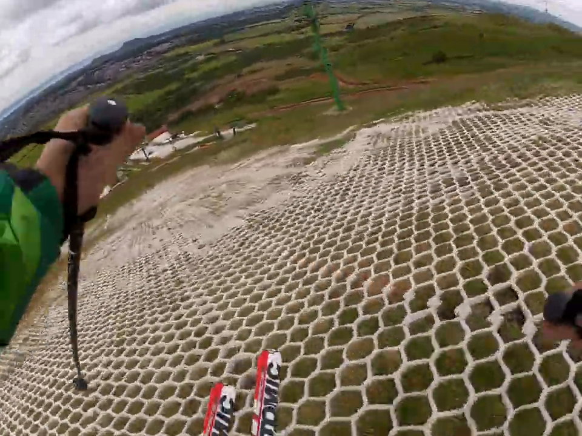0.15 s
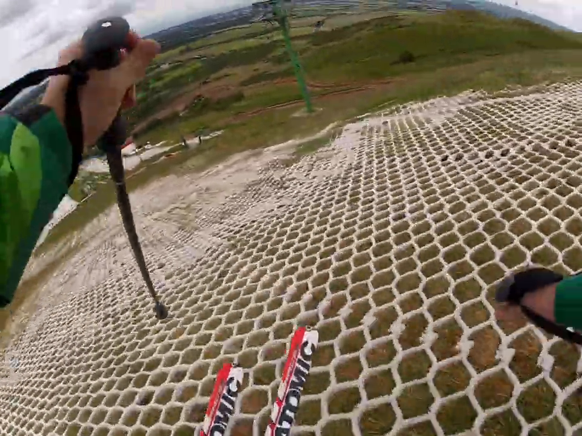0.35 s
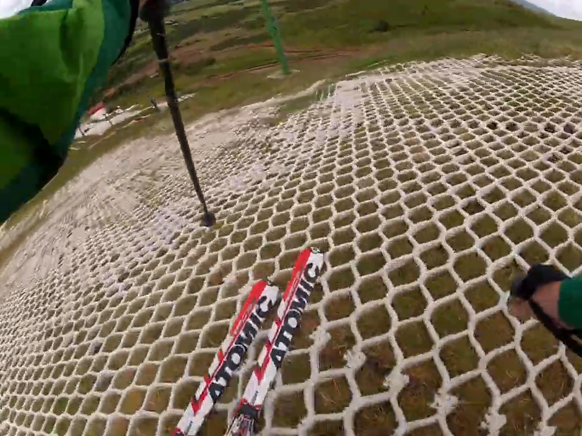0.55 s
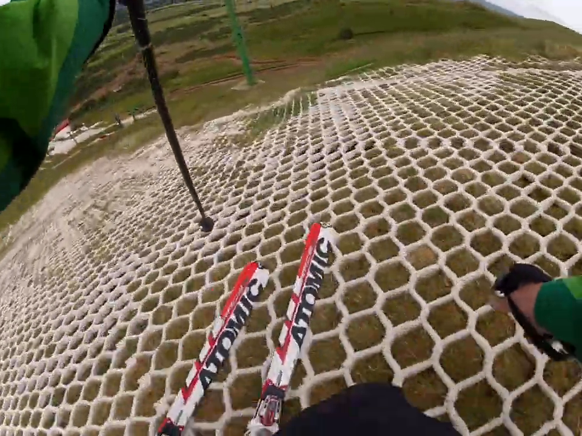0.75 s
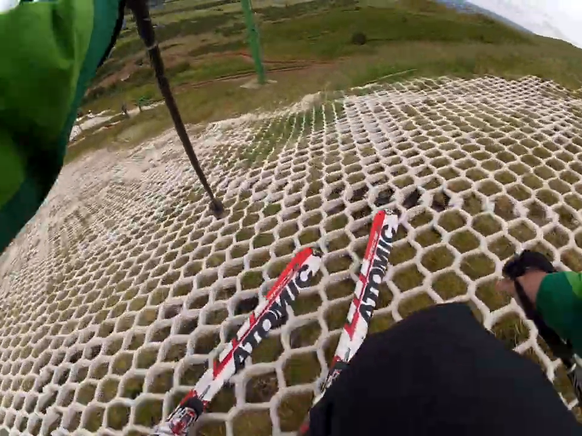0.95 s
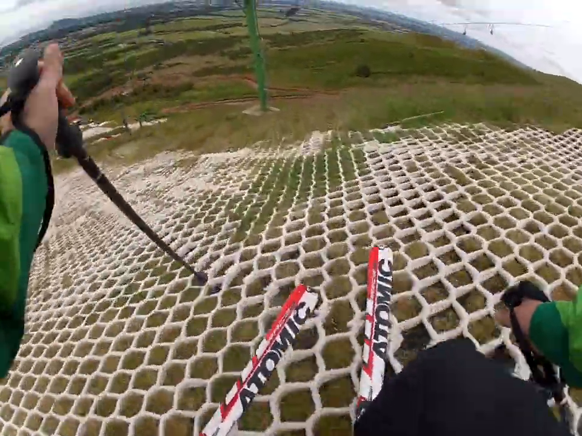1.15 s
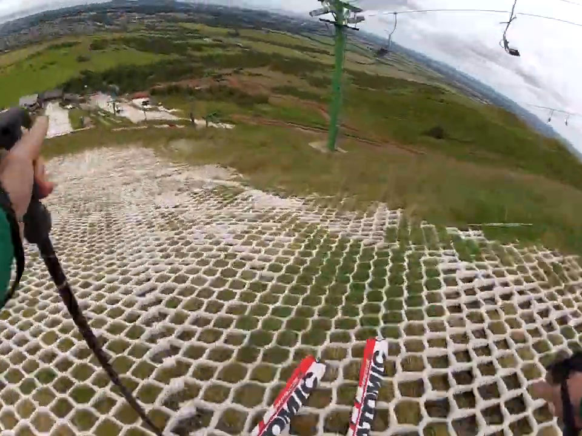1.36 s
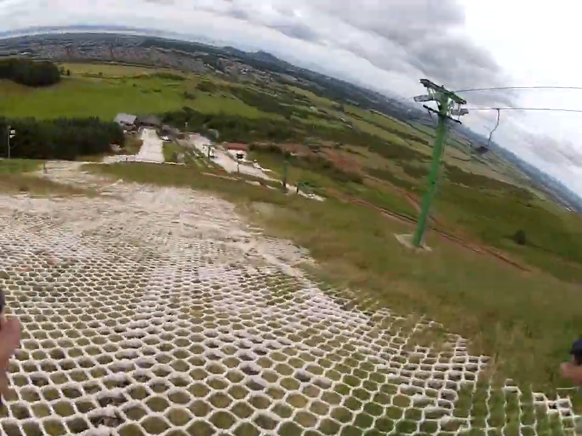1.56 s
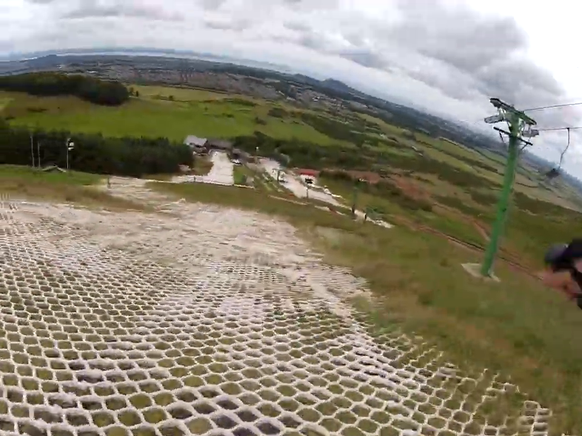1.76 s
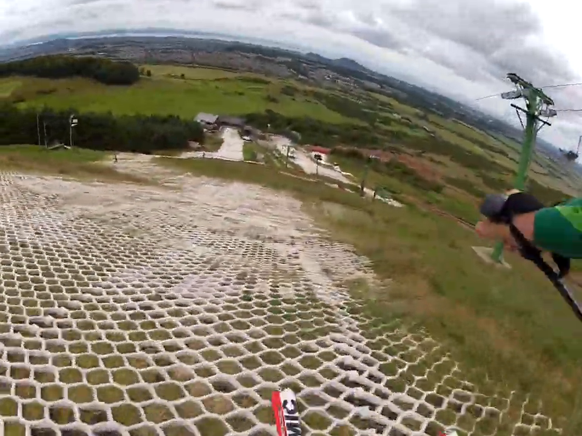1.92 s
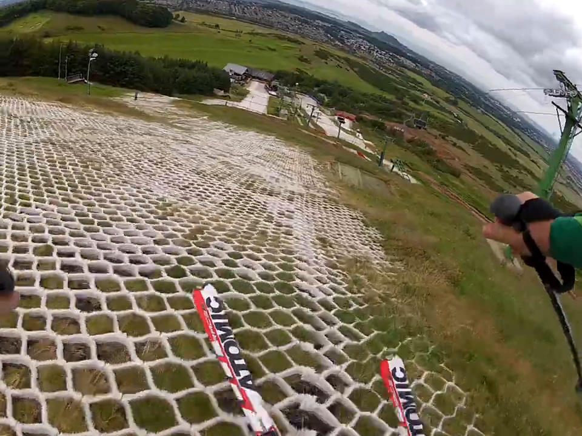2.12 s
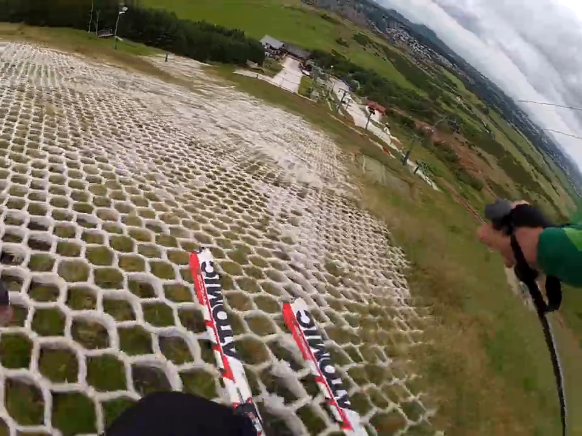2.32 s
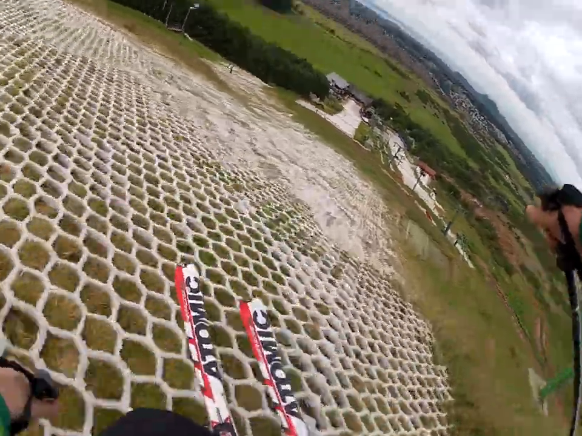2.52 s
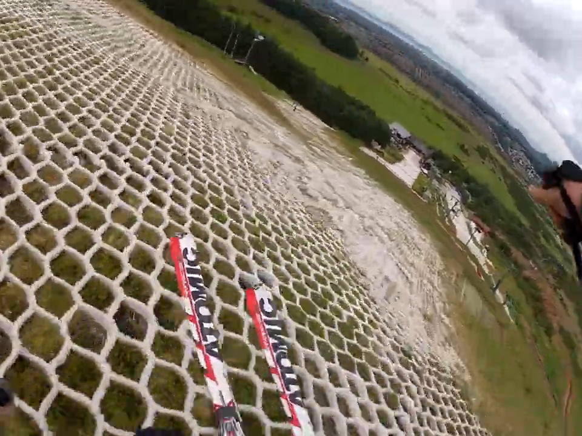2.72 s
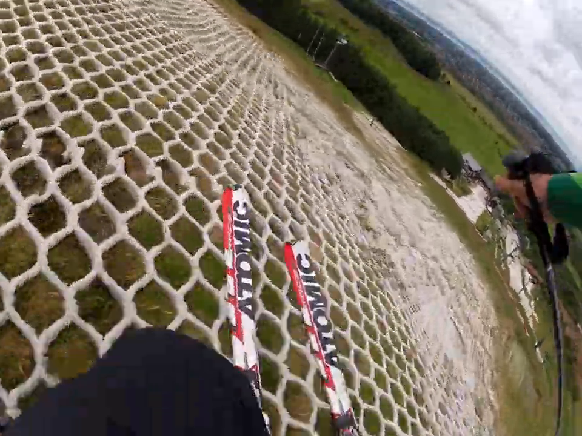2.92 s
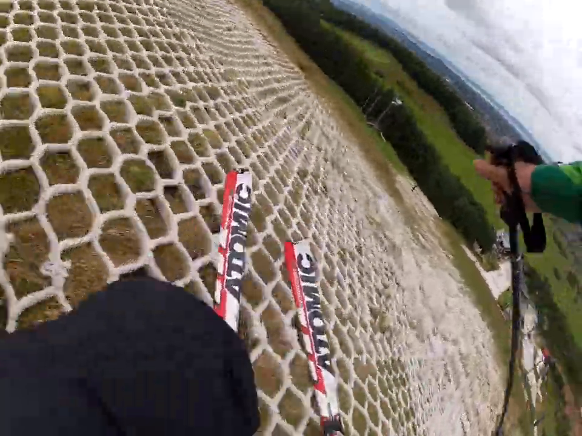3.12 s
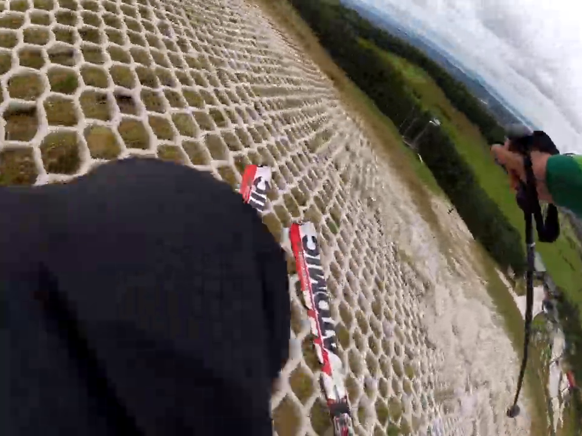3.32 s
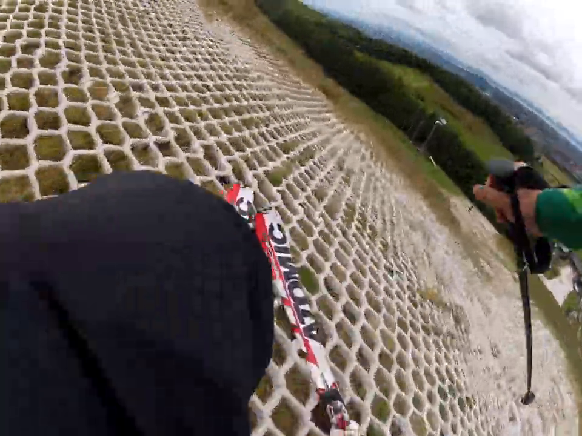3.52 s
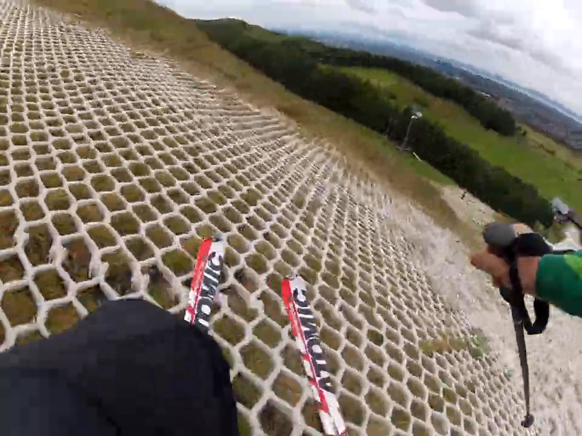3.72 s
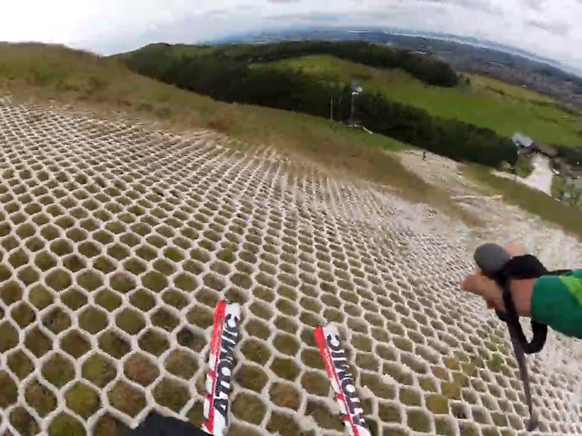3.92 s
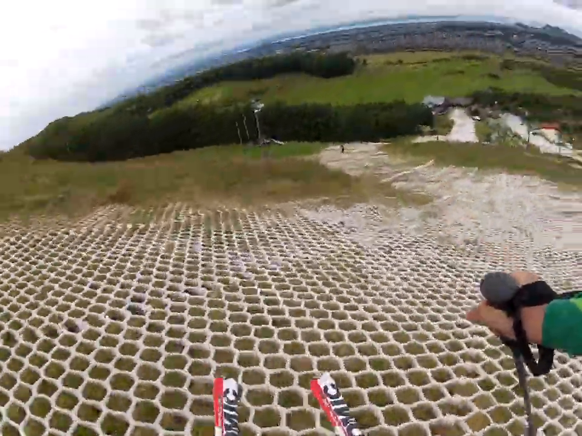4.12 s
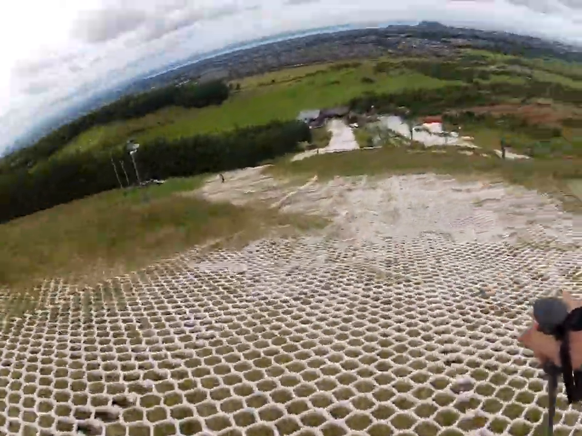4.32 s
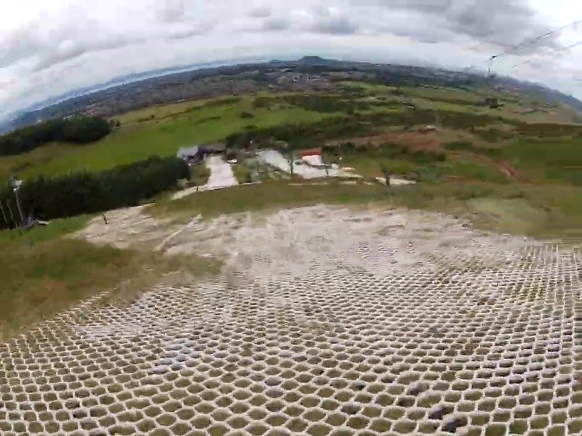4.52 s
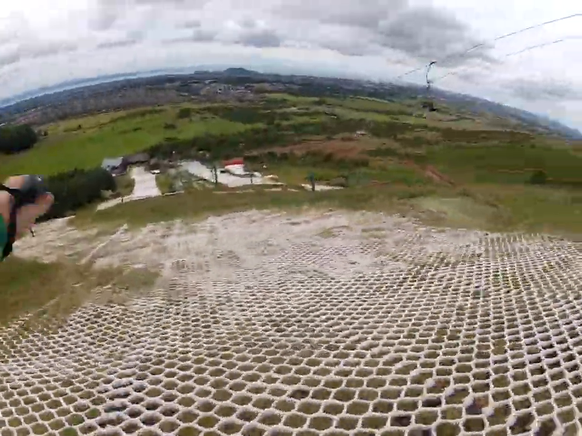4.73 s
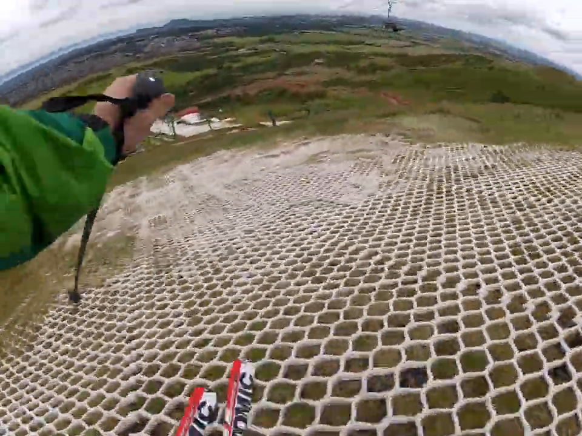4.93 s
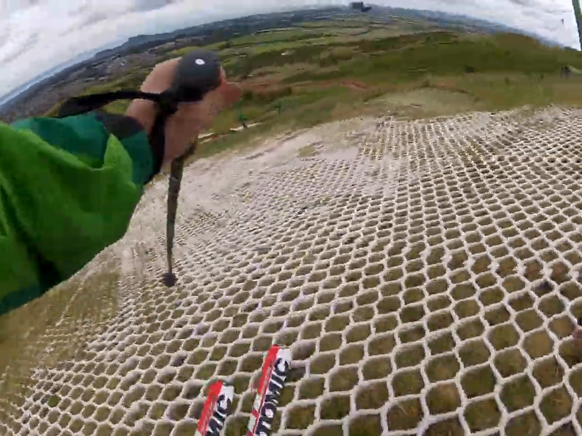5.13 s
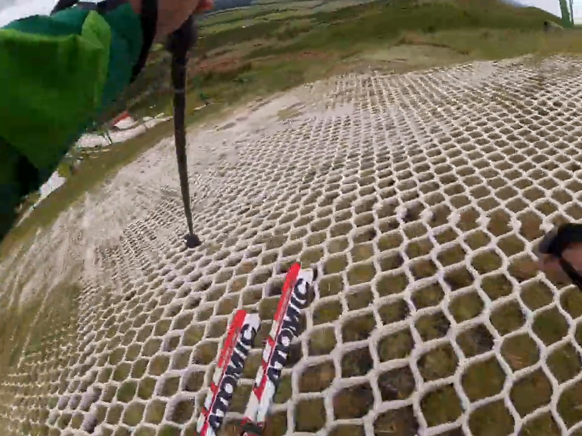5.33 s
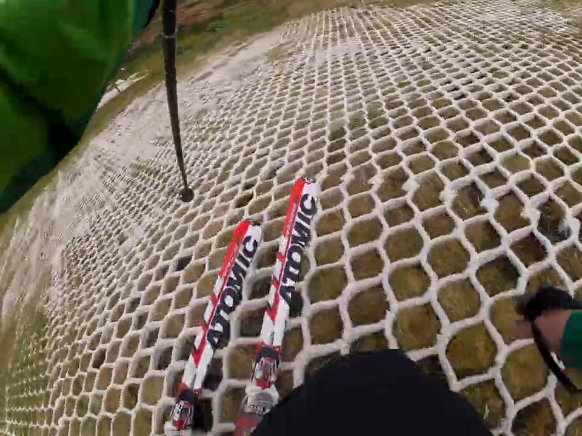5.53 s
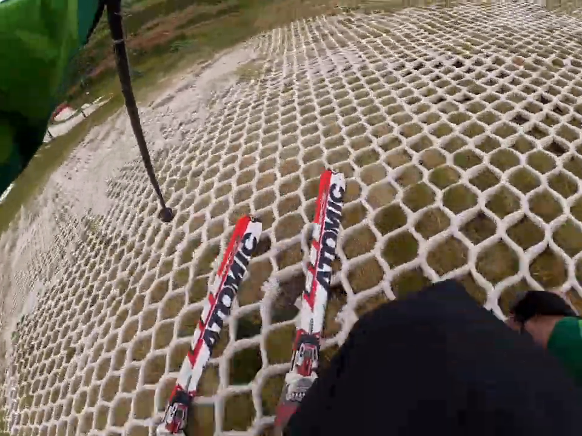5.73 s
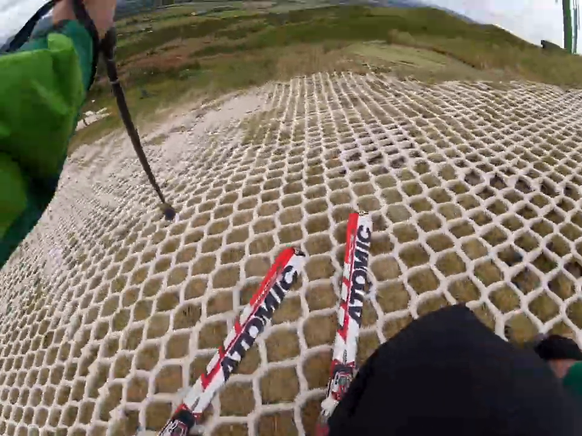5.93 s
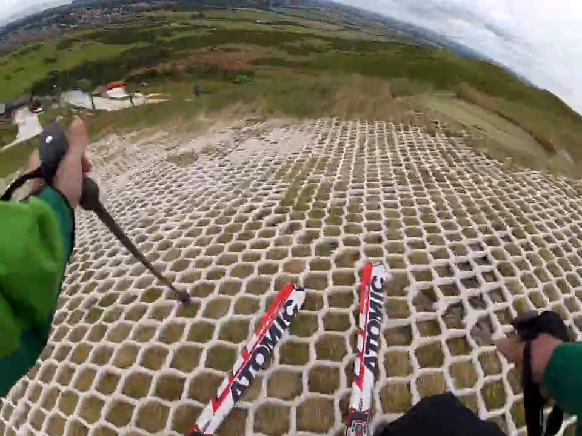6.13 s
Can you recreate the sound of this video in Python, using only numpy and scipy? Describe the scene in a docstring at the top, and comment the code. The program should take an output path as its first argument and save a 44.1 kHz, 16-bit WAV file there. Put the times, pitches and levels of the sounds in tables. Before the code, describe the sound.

Skis run down a plastic bristle slope in three turns, heard close from a body-worn microphone. The edges make a gritty, ringing scrape with tiny squeaks, over a hiss and low rumble, all with a glassy fizz. Wind buffets the microphone, strongly around 0.3 seconds. The first turn swells from 0.4 to 1.2 seconds, with a sharp clack of gear at 0.6. Everything drops to a lull around 1.6 to 1.9 seconds. Light knocks near 2 seconds open the second turn, with a faint swish of grass. Clacks and dull ski slaps cluster from 2.7 to 2.9 seconds, and the scrape stays strong until about 3.7. It then recedes under short gusts, and the wind surges from 4.6 to 5.1 seconds. The third turn bites hardest around 5.4 seconds with a brief squeak, then scrape and wind fade by about 6.3.

```python
"""On a bristle-mat dry ski slope: three turns, heard close up from a camera worn on the skier's body.
Wind buffets the microphone as the skier swings through the fall line. Underfoot the skis rumble over
the ribs of the mat, hiss sideways, brush the grass at its side, and now and then clack and slap down.
The edges flick thousands of stiff plastic bristles, biting, skipping and squeaking as they go.
The camera holds each of its 12000 samples a second, which adds a glassy fizz."""
import sys
import numpy as np
from scipy import signal
from scipy.fft import rfft, irfft, next_fast_len
from scipy.io import wavfile
from scipy.ndimage import uniform_filter1d, map_coordinates

SR = 44100
rng = np.random.default_rng(int(sys.argv[2]) if len(sys.argv) > 2 else 0)


def dump_mix(stems):
    """Bounce the given channels to the path in sys.argv[1] as a 16-bit WAV at rate SR."""
    frames = np.atleast_2d(stems).T  # one column per channel
    limited = np.clip(frames, -1, 1)  # hard clip at full scale
    pcm = np.round(limited * 32767).astype(np.int16)
    wavfile.write(sys.argv[1], SR, pcm)


N = 276066
TIME = np.arange(N) / SR


def undb(db):
    """Decibels to gain."""
    return 10 ** (np.asarray(db) / 20)


def unit(x):
    """Scale to rms 1."""
    return x / np.sqrt(np.mean(x ** 2))


def curve(table):
    """A control joined by straight lines in time."""
    return np.interp(TIME, *np.transpose(table))


def bump(centre_s, width_s):
    """A smooth hump of height 1, width_s wide at half height."""
    return np.exp(-np.log(2) * (2 * (TIME - centre_s) / width_s) ** 2)


def add(out, start_s, sound, peak_db):
    """Mix a sound in at start_s with the given peak."""
    part = out[int(start_s * SR):][:len(sound)]
    part += (sound * undb(peak_db) / np.abs(sound).max())[:len(part)]


def colour(x, points):
    """Causal filter through the given (freq_hz, gain_db) points."""
    size = next_fast_len(len(x) // 2 + 4096) * 2
    hz, db = np.transpose(points)
    bin_hz = np.arange(size // 2 + 1) * SR / size
    gain_db = np.interp(np.log(bin_hz + 1), np.log(hz), db)
    cepstrum = irfft(np.log(undb(gain_db)))
    cepstrum[1:size // 2] *= 2  # fold onto positive time for minimum phase
    cepstrum[size // 2 + 1:] = 0
    return irfft(rfft(x, size) * np.exp(rfft(cepstrum)))[:len(x)]


def resonate(x, hz, width_hz):
    """Two-pole resonance, gain 1 at the centre."""
    return signal.lfilter(*signal.iirpeak(hz, hz / width_hz, fs=SR), x)


def walk(rate_hz):
    """Smooth random motion of rms 1 through rate_hz values a second."""
    knots = rng.standard_normal(4096)
    return unit(map_coordinates(knots, [TIME * rate_hz], order=2, mode="wrap"))


def flutter(rate_hz, depth_db):
    """A wavering gain that keeps the mean power."""
    return unit(undb(depth_db * walk(rate_hz)))


def flicks(per_second, spread_db):
    """Dense clicks of uneven size, as of bristles snapping free."""
    hit = rng.random(N) < per_second / SR
    sign = rng.choice([-1, 1], N)
    size_db = spread_db * np.clip(rng.standard_normal(N), -2, 2)
    return unit(hit * sign * undb(size_db))


def puffs(points, rate_hz, depth_db):
    """Uneven eddies that even out over a fraction of a second."""
    eddies = colour(rng.standard_normal(N) * flutter(rate_hz, depth_db), points)
    return eddies / np.sqrt(uniform_filter1d(eddies ** 2, size=SR // 8))


# air flow at the microphone, swelling through the fall line: time_s, level_db (0 is full flow)
AIR_FLOW = [(0.0, -9.5), (0.33, -0.5), (0.61, -14.0), (0.71, -6.0), (1.08, -23.0), (1.76, -38.5),
            (1.92, -29.0), (2.0, -19.0), (2.73, -11.0), (3.68, -12.0), (3.88, -23.5), (4.27, -20.0),
            (4.62, -1.5), (5.01, -2.5), (5.75, -11.5), (6.26, -36.0)]
# gusts striking the microphone: centre_s, buffet_rise_db, push_rise_db, width_s
MIC_GUSTS = [(.09, 0.5, 7.5, .06), (0.505, 3, 3.5, .06), (.78, -0.5, 5.5, 0.32), (1.56, 7, 10, .08),
             (1.812, 6, 17, 0.091), (2.703, 4, 6, 0.075), (3.257, 3, 6.5, 0.12), (3.507, 7, 5, 0.067),
             (3.706, 6.5, 10, 0.035), (4.055, 12, 12, 0.056), (4.178, 11, 0, 0.045), (4.8, 0, 8, 0.069),
             (5.067, 4, 4, .08), (5.645, 4.5, 5.5, 0.085)]
# small eddies right at the microphone port: freq_hz, gain_db
BUFFET_SPECTRUM = [(30, -27), (70, -3.5), (115, 2), (210, -1), (340, -6.5), (500, -15), (700, -27.5),
                   (1100, -42.5), (3000, -66)]
# the deep push of large eddies: freq_hz, gain_db
PUSH_SPECTRUM = [(6, -28), (14, 4.5), (25, -6.5), (45, 0.5), (75, 1), (110, -6.5), (200, -34.5), (600, -59)]


def wind():
    """Small eddies flap at the microphone port; large ones push on it slowly."""
    flow_db = curve(AIR_FLOW)
    gusty_db = flow_db + 0.67 * walk(rate_hz=15)
    buffet_db = -13.5 + gusty_db + sum(db * bump(s, width) for s, db, _, width in MIC_GUSTS)
    push_db = -22 + 0.8 * gusty_db + sum(db * bump(s, width) for s, _, db, width in MIC_GUSTS)
    # the small eddies rise in pitch with the flow and as the skier gathers speed
    octaves = 0.0146 * flow_db + 0.057 * TIME
    eddies = puffs(BUFFET_SPECTRUM, rate_hz=80, depth_db=1.5)
    buffet = map_coordinates(eddies, [np.cumsum(2 ** octaves)], order=3, mode="mirror")
    push = puffs(PUSH_SPECTRUM, rate_hz=41, depth_db=0.7)
    return buffet * undb(buffet_db) + push * undb(push_db)


# grass at the side of the mat: freq_hz, gain_db
GRASS_SPECTRUM = [(400, -17), (850, -2), (1100, -4), (1400, 4), (1750, -5.5), (3000, -18)]


def grass(enter_s=2.145, leave_s=3.15, rise_db_per_s=75, fall_db_per_s=15):
    """Stalks swish under the outer ski in the second turn: a quick entry, a hold and a slow exit."""
    before_db = rise_db_per_s * np.maximum(enter_s - TIME, 0)
    after_db = fall_db_per_s * np.maximum(TIME - leave_s, 0)
    swish = unit(colour(flicks(per_second=3000, spread_db=8), GRASS_SPECTRUM))
    return swish * undb(-36 - before_db - after_db)


# the skis drumming underfoot: freq_hz, gain_db
RUMBLE_SPECTRUM = [(40, -6.5), (200, -10.5), (400, 0), (600, -0.5), (700, -5), (820, -13.5), (1100, -21),
                   (2000, -43.5)]


def rumble(edging_db, flow_db):
    """Ribs of the mat drum on the skis, harder with load and with speed, which the air flow follows."""
    drumming = unit(colour(flicks(per_second=1500, spread_db=3), RUMBLE_SPECTRUM))
    level_db = -26 + 0.41 * edging_db + 0.19 * flow_db
    return drumming * flutter(rate_hz=49, depth_db=0.5) * undb(level_db)


# the skier changes edges and a turn begins: start_s
TURN_STARTS = [-0.24, 1.92, 4.26]
# the skis slip sideways: centre_s, rise_db, width_s
SIDE_SLIPS = [(0.642, 2.5, .11), (1.55, 4.5, 0.073), (2.15, 3.5, 0.21), (2.88, 4, .07), (4.22, 1.5, .2),
              (4.948, 2.5, 0.12), (5.39, 2.5, .1)]
# hiss of the bases, a leg's length below the microphone: freq_hz, gain_db
SKID_SPECTRUM = [(300, -17), (750, -4.5), (1080, -5.5), (1450, 0), (2600, -2), (3400, 1), (3900, 3),
                 (4400, 1.5), (4950, 2), (5500, -6), (6000, -8.5)]


def skid(edging_db, flow_db, fade_db_per_s=0.94):
    """The bases slide over the bristle tips with a gritty hiss, louder with load and speed."""
    starts = np.array(TURN_STARTS)
    turn_age_s = TIME - starts[np.searchsorted(starts, TIME) - 1]
    turn_age_s = uniform_filter1d(turn_age_s, size=SR // 8)  # ease the change of edges
    carve_db = -fade_db_per_s * turn_age_s  # each turn starts as a skid and settles into a carve
    slip_db = sum(db * bump(s, width) for s, db, width in SIDE_SLIPS)
    level_db = -26.5 + 0.66 * edging_db + 0.082 * flow_db
    hiss = unit(colour(flicks(per_second=7000, spread_db=1), SKID_SPECTRUM))
    return hiss * undb(level_db + slip_db + carve_db)


def contact(rattle_s, rattle_gain):
    """One sharp blow, then a rattle that falls 17 dB every rattle_s."""
    t = np.arange(2048) / SR
    return (t == 0) + rattle_gain * rng.standard_normal(len(t)) * np.exp(-2 * t / rattle_s)


# a ski lands on the mat: start_s, peak_db, pitch_hz
SKI_SLAPS = [(0.5823, -15, 480), (1.942, -17, 740), (2.04, -18.5, 450), (2.717, -13, 557),
             (2.8063, -7, 540), (2.8118, -8.5, 500), (2.858, -10.5, 450), (2.893, -15, 560)]
# the dull tone of a landing: freq_hz, gain_db
SLAP_SPECTRUM = [(80, -2), (330, 4), (700, -7.5), (950, -10), (1600, -12), (5000, -11)]


def slaps():
    """A ski slaps down on the mat with a short, dull thud."""
    out = np.zeros(N)
    for start_s, peak_db, pitch_hz in SKI_SLAPS:
        thud = resonate(contact(rattle_s=0.0073, rattle_gain=0.059), pitch_hz, width_hz=170)
        add(out, start_s, colour(thud, SLAP_SPECTRUM), peak_db)
    return out


# skis, bindings and poles knock close to the microphone: start_s, peak_db, pitch_hz, rattle_s
GEAR_CLACKS = [(0.5819, 0.4, 4170, 0.0026), (0.5833, -8, 2950, .004), (.9645, -15, 3300, .003),
               (1.714, -20, 2660, 0.0054), (1.9408, -15.5, 2160, 0.008), (2.0365, -13.5, 3670, 0.0035),
               (2.6812, -15.5, 3500, 0.0033), (2.714, -11, 3400, 0.0034)]
# a blow heard through plastic and boot, without the highest treble: freq_hz, gain_db
BLOW_SPECTRUM = [(300, -9), (900, 3.5), (4700, -2), (5400, 1.5), (6200, -28), (9000, -41)]
# ring of the hard gear: pitch_hz, width_hz, level_db
GEAR_RING = [(1300, 170, -3), (2900, 140, 6.5), (4460, 120, -4)]


def clacks(crack_db=2, crack_width_hz=1300):
    """Each hard blow cracks at its own pitch and sets the gear ringing."""
    out = np.zeros(N)
    for start_s, peak_db, pitch_hz, rattle_s in GEAR_CLACKS:
        blow = colour(contact(rattle_s, rattle_gain=0.15), BLOW_SPECTRUM)
        ring = sum(undb(db) * resonate(blow, hz, width) for hz, width, db in GEAR_RING)
        crack = resonate(blow, pitch_hz, crack_width_hz)
        crack = resonate(crack, pitch_hz, 2 * crack_width_hz)
        add(out, start_s, ring + undb(crack_db) * crack, peak_db)
    return out


# an edge grabs the plastic: centre_s, peak_db, pitch_hz, length_s
EDGE_SQUEAKS = [(.572, -20, 2800, 0.0072), (0.64, -10.5, 2800, 0.0029), (.823, -15.5, 2900, 0.004),
                (2.3255, -19, 2685, .005), (3.116, -12, 2850, 0.0037), (5.4403, -5.5, 2780, 0.0038)]


def squeaks():
    """An edge sticks and slips for a few cycles, making a brief tone."""
    return sum(undb(db) * np.exp(-(2 * (TIME - s) / length) ** 2) * np.sin(2 * np.pi * hz * TIME)
               for s, db, hz, length in EDGE_SQUEAKS)


def zings(per_second=70, centre_hz=2550, range_octaves=0.55, length_s=0.016, spread_db=2.5):
    """Single tufts catch on the edge and sing briefly, each at its own pitch."""
    out = np.zeros(N)
    t = np.arange(2048) / SR
    swell = np.exp(-(2 * (t - t.mean()) / length_s) ** 2)
    tufts = rng.random((2000, 3))
    for when, pitch, size in tufts[:int(per_second * N / SR)]:
        hz = centre_hz * 2 ** (range_octaves * (pitch - 0.5))
        peak_db = -spread_db * np.log(1 - size)  # a few tufts stand out
        add(out, when * N / SR, swell * np.sin(2 * np.pi * hz * t), peak_db)
    return unit(out)


# an edge bites (+) or skips (-): centre_s, change_db, width_s
EDGE_BITES = [(0.199, 5.5, 0.021), (0.508, 3.5, 0.017), (0.605, -10.5, 0.022), (1.435, 3, .025),
              (1.675, -7.5, 0.074), (1.723, 5, 0.05), (1.887, 7, 0.012), (2.024, -2, .028),
              (2.301, -5, 0.052), (2.327, 2, .02), (2.52, 7.5, 0.013), (2.978, -4, .023),
              (3.002, 5.5, 0.012), (3.112, 2.9, 0.048), (3.277, 2.5, 0.011), (3.575, 4.5, 0.022),
              (3.701, 5, 0.014), (3.84, 5, 0.02), (4.219, 4.5, 0.024), (4.26, -5, .04), (4.327, 3, .03),
              (5.383, 5.5, 0.012), (5.436, 7.5, 0.012), (5.458, -3, 0.02), (5.5, 6.5, .03),
              (5.562, 5.5, 0.031), (5.584, 0, 0.015), (5.636, 4.5, 0.019)]


def jolts():
    """Gain from quick changes of edge pressure: bites, skips and chance bumps in the mat."""
    bite_db = sum(db * bump(s, width) for s, db, width in EDGE_BITES)
    gain = undb(bite_db + 0.2 * walk(rate_hz=36))
    # bites and skips change the scrape briefly while its average loudness stays the same
    return gain / np.sqrt(uniform_filter1d(gain ** 2, size=SR // 6))


def chatter():
    """Gain from the edges shuddering over the ribs of the mat."""
    return flutter(rate_hz=70, depth_db=1.18) * flutter(rate_hz=300, depth_db=0.78)


# ring of the scraped bristles: pitch_hz, width_hz, level_db
BRISTLE_RING = [(1538, 78, -5), (1964, 87, 0), (2320, 76, 0), (2635, 78, 0), (2823, 214, -3),
                (3117, 160, -4.5)]
# tone of the edges, a leg's length below the microphone: freq_hz, gain_db
EDGE_SPECTRUM = [(600, -29.5), (1100, -4), (1500, -1), (2000, 2), (2950, 0.5), (3400, -10.5), (5500, -11)]


def scrape(edging_db):
    """Each group of bristles rings at its own pitch as the edge flicks it, with zings mixed in."""
    ring = sum(undb(db) * resonate(flicks(per_second=5000, spread_db=4), hz, width)
               for hz, width, db in BRISTLE_RING)
    bristles = unit(colour(ring, EDGE_SPECTRUM))
    return unit(bristles + undb(-10) * zings()) * undb(-21.5 + edging_db)


# how hard the edges press into the mat through the turns: time_s, level_db (0 is full pressure)
EDGE_PRESSURE = [(0.0, -8.0), (0.31, -14.0), (0.42, -7), (0.68, -1.5), (0.97, -6.5), (1.2, -4), (1.5, -16),
                 (1.59, -27), (1.92, -21.5), (2.08, -10.5), (2.46, -6.0), (2.57, -11), (2.81, -2),
                 (3.36, -2.0), (3.64, -2.5), (4.23, -21), (4.66, -18), (5.43, 0.0), (5.73, -7), (6.08, -9),
                 (6.26, -19.5)]


def scene():
    """Skis and wind at one body-worn microphone, the same in both ears."""
    edging_db, flow_db = curve(EDGE_PRESSURE), curve(AIR_FLOW)
    jolt, shudder = jolts(), chatter()
    # the edges follow every change of pressure, the flat bases less so
    edges = jolt * shudder * scrape(edging_db) + squeaks()
    bases = jolt ** 0.61 * shudder ** 0.8 * (skid(edging_db, flow_db) + grass())
    drumming = (jolt * shudder) ** 0.54 * rumble(edging_db, flow_db)
    mono = edges + bases + drumming + clacks() + slaps() + wind()
    return np.array([mono, mono])


def record(dry):
    """The camera samples slowly, clips peaks and holds each value, mirroring the sound about its rate."""
    hold_hz, top_hz = 12000, 15150
    slow = signal.resample_poly(dry, hold_hz, SR, axis=1)
    steps = np.repeat(np.clip(slow, -0.75, 0.75), 4, axis=1)
    held = signal.resample_poly(steps, SR, 4 * hold_hz, axis=1)
    lowpass = signal.ellip(10, 0.2, 70, top_hz, fs=SR, output="sos")
    return signal.sosfilt(lowpass, held)


dry = scene()
out = record(dry)
dump_mix(out)
```